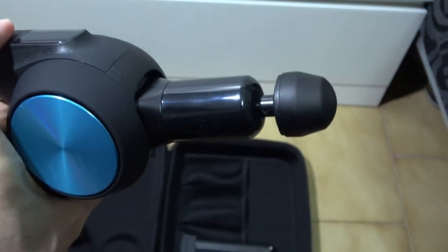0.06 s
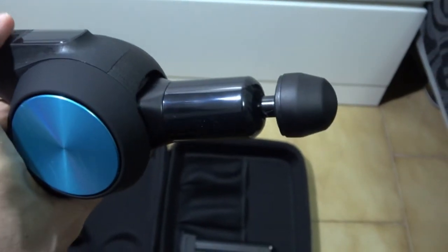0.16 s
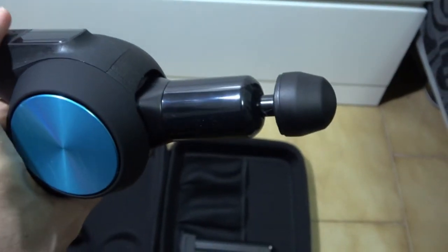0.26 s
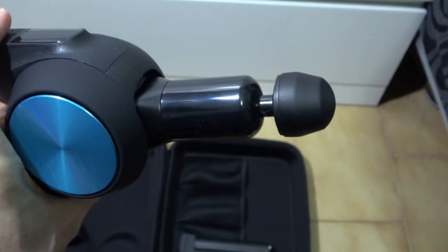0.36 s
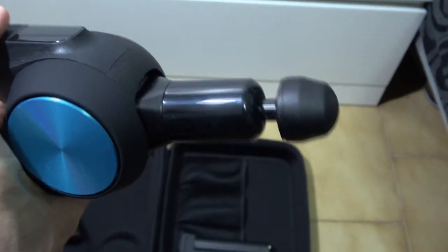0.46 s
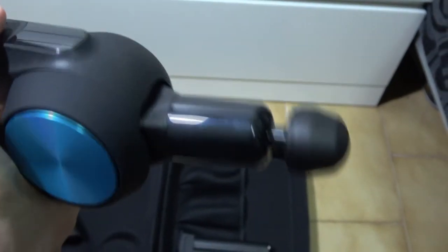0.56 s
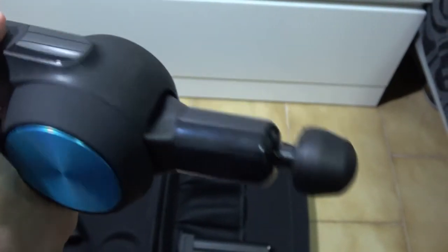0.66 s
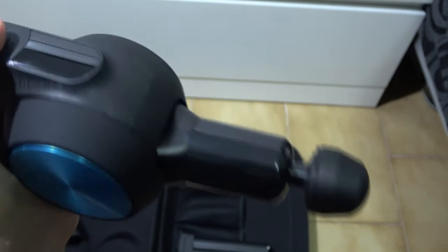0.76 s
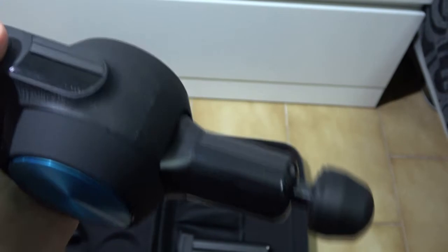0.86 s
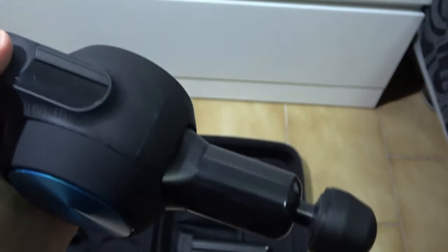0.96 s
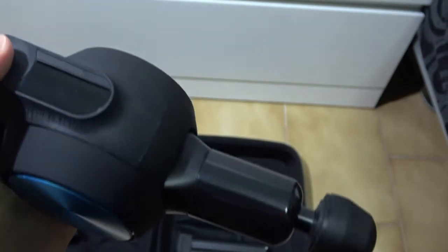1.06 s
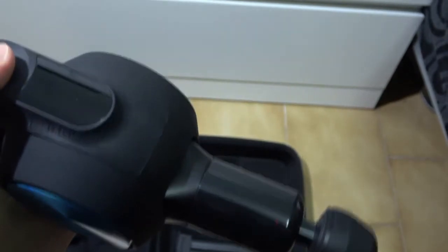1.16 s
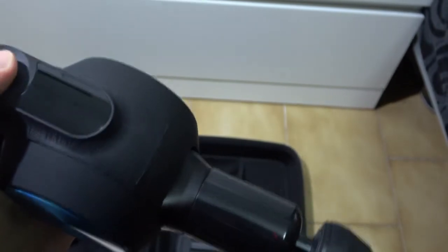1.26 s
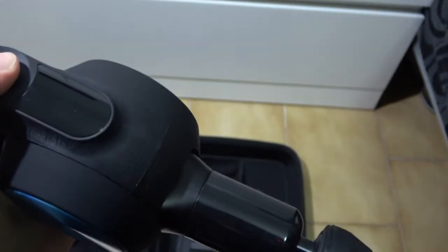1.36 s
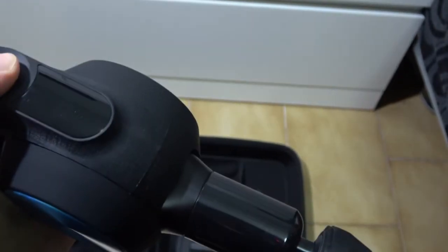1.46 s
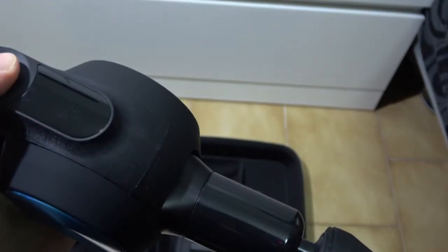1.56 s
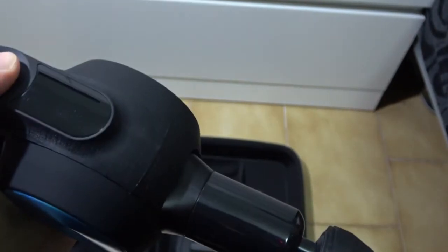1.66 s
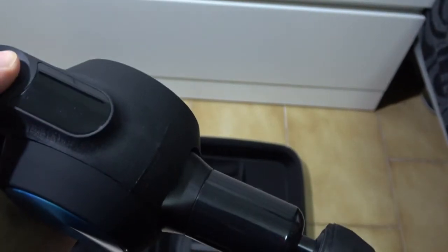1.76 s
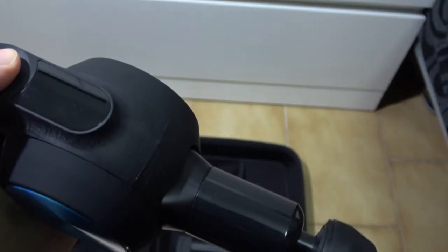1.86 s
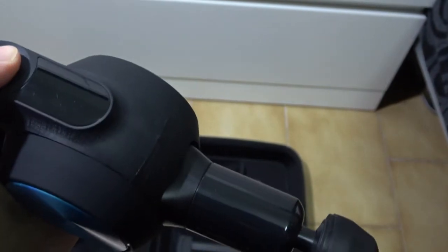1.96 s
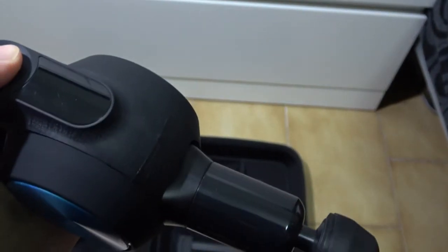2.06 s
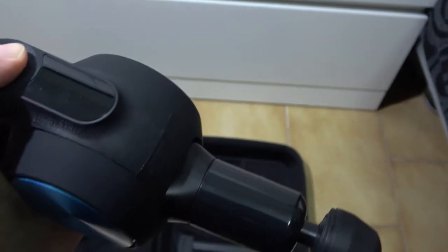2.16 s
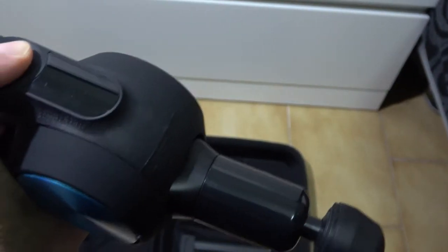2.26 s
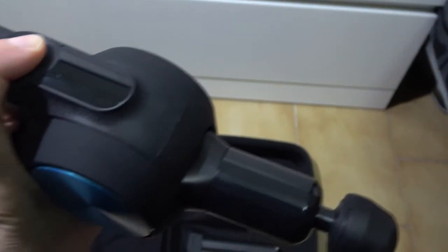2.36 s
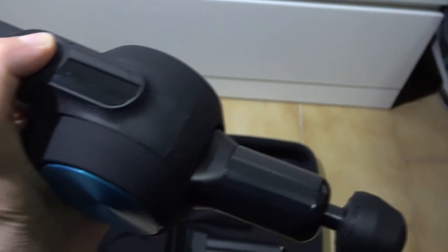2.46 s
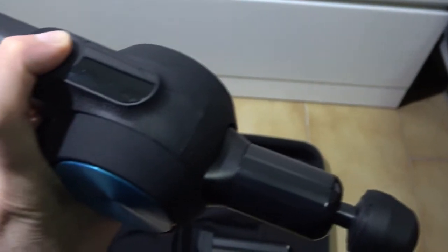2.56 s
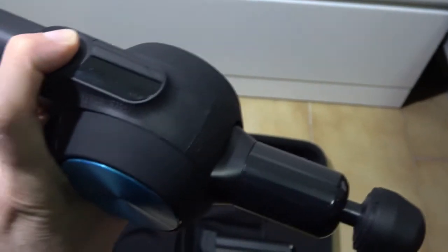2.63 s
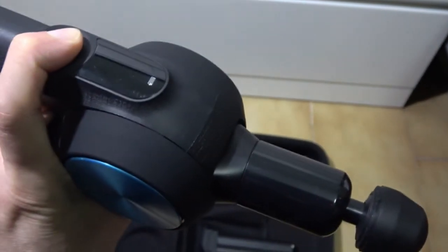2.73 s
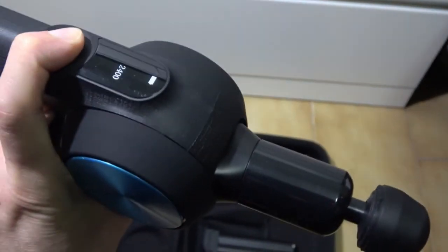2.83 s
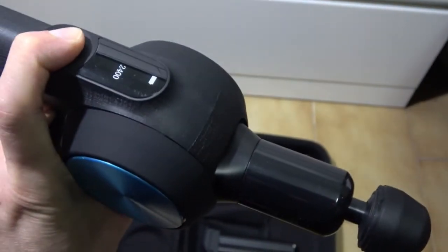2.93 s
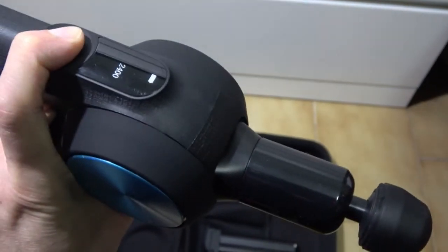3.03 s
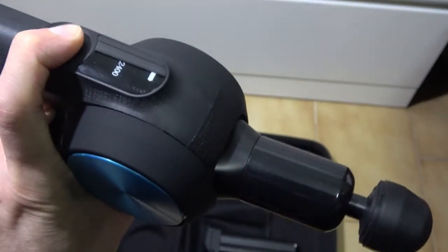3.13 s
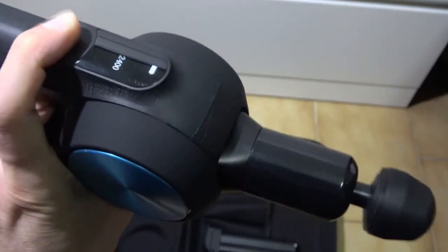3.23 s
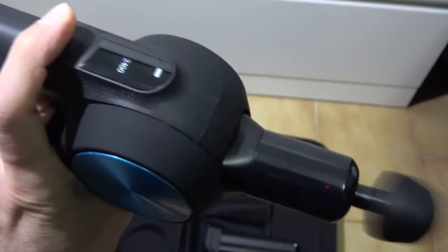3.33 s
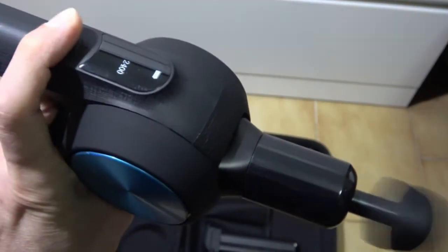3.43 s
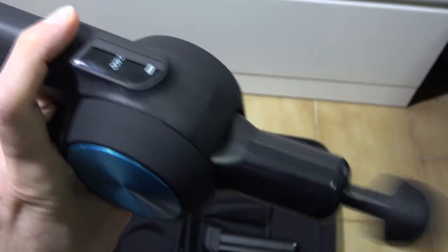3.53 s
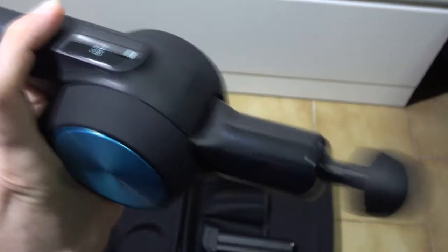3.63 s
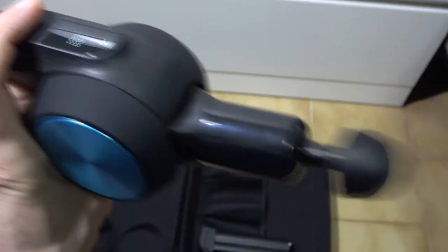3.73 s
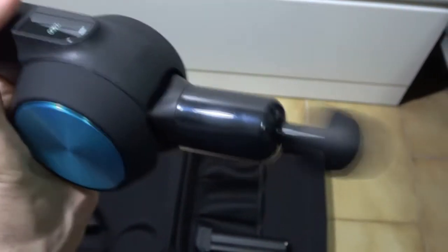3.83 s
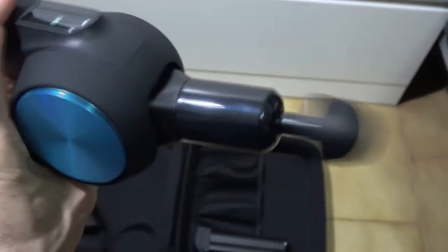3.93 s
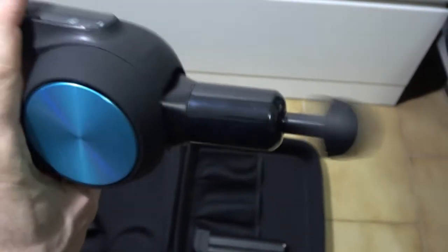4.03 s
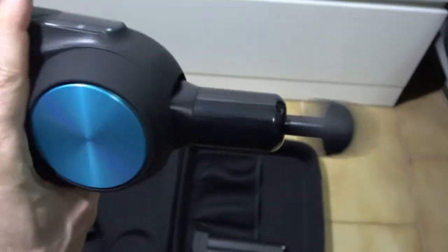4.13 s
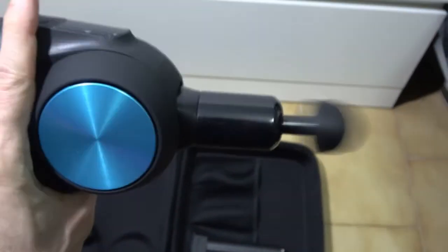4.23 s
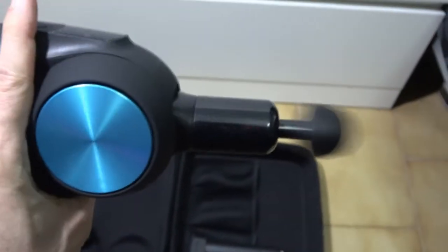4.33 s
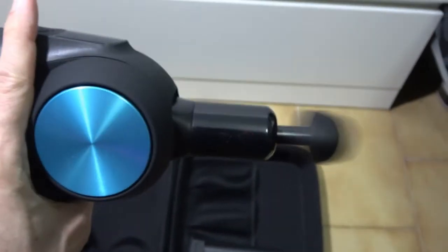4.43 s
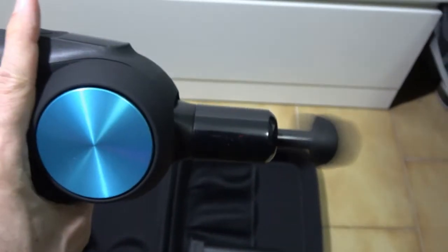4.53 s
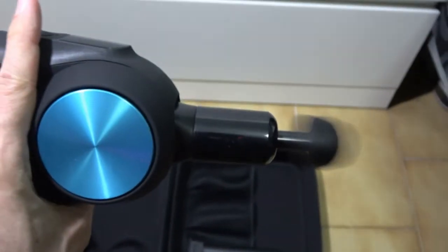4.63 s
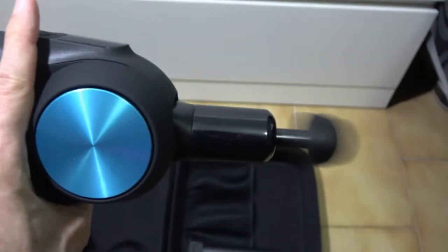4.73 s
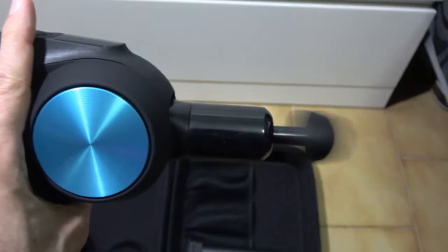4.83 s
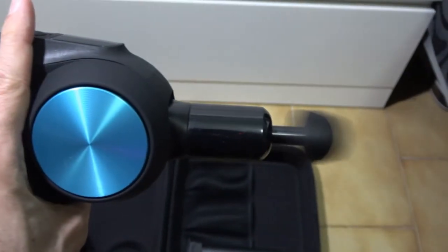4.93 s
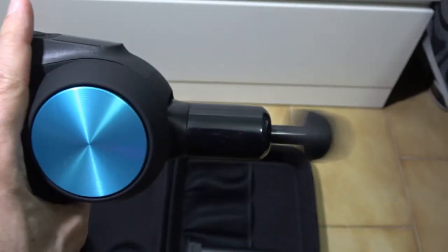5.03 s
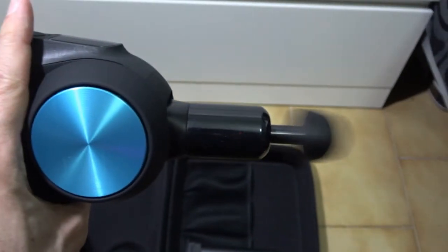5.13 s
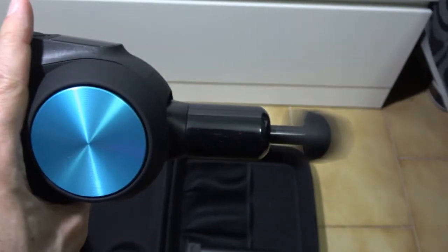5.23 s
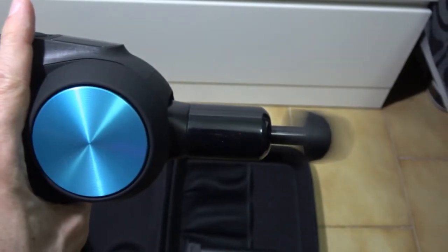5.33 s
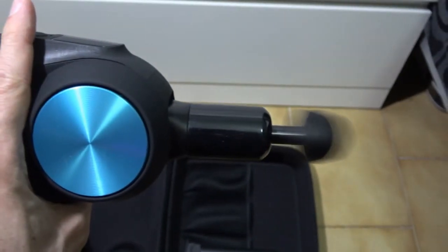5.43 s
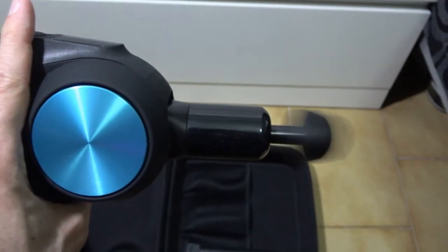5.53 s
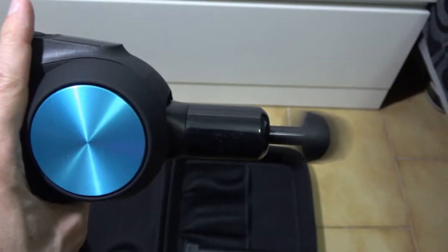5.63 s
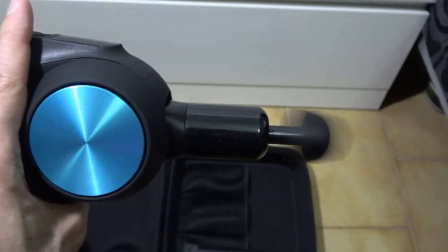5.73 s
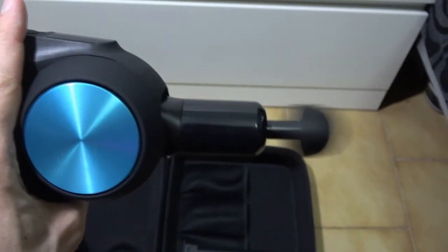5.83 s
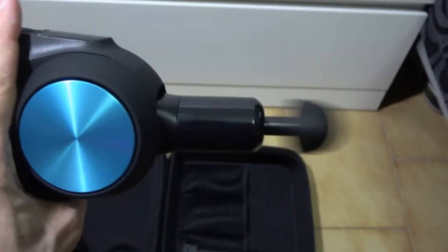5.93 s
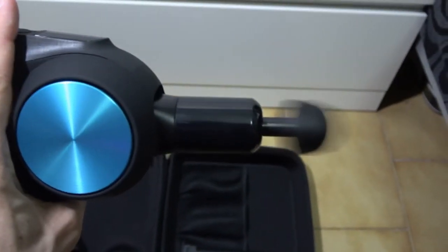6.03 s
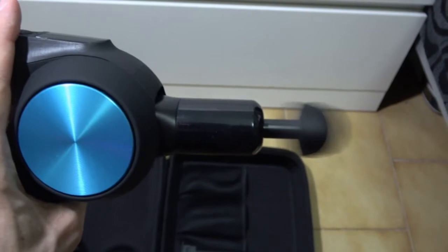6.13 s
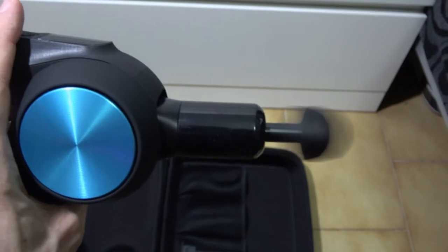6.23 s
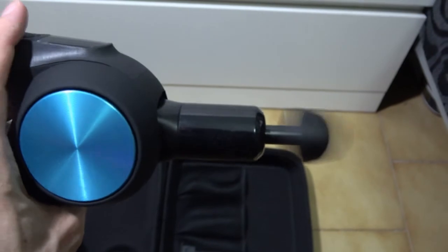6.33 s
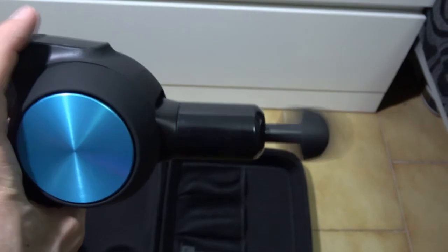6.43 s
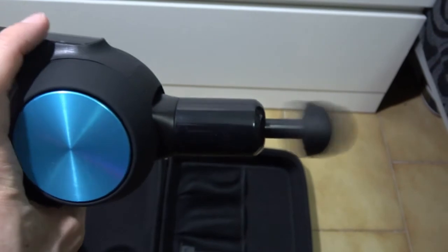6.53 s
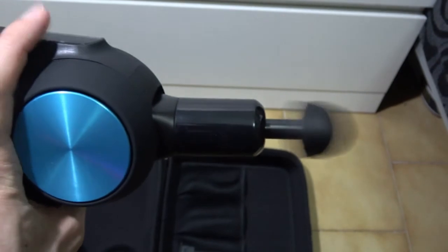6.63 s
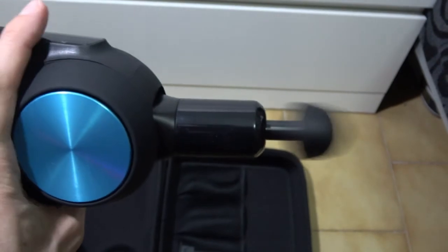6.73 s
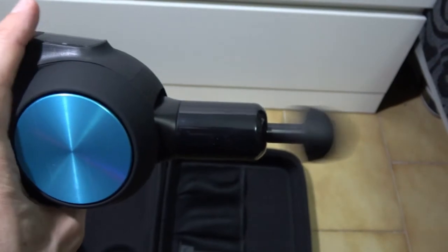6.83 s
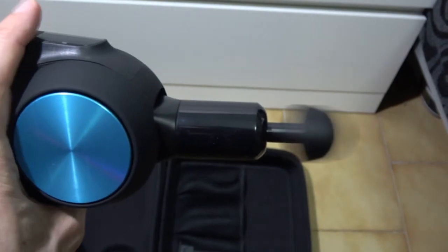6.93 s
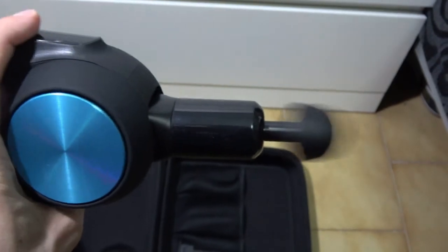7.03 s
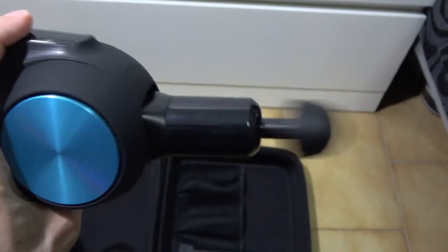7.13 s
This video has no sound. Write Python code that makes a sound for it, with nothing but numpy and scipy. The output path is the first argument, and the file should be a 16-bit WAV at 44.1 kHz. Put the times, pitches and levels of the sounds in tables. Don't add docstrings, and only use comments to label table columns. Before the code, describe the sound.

A quiet small tiled room with a faint distant appliance hum. Fingers tick and briefly rub a hard plastic shell, then button snaps sound close by. After the last snap a handheld massage gun lurches on, spins up within about half a second, and runs with rapid knocking, gear whine and bearing hiss, its pitch creeping upward to the end. Close stereo microphones, gun slightly left, with little echo.

```python
import sys
import numpy as np
from scipy import signal
from scipy.fft import rfft, irfft, next_fast_len
from scipy.io import wavfile
from scipy.ndimage import uniform_filter1d

SR = 44100
rng = np.random.default_rng(int(sys.argv[2]) if len(sys.argv) > 2 else 0)


def output_pcm(signal):
    pcm = np.clip(np.atleast_2d(signal).T, -1, 1) * 32767
    wavfile.write(sys.argv[1], SR, np.round(pcm).astype(np.int16))


def volts_from_db(level):
    exponent = np.asarray(level, float) / 20
    return 10 ** exponent


N = 316638

# (frequency [Hz], density [dB per Hz])
ROOM_TONE = [(13, -33), (22, -9.5), (47, -4.5), (66, -12.5), (105, -3.5), (221, -10.5), (504, -7.5),
             (701, -5.5), (898, -5.5), (1150, -11.5), (1280, -8.5), (1390, -16.5), (2850, -25), (3180, -30),
             (15600, -33.5)]
# (frequency [Hz], level [dB])
ROOM_SIDE = [(40, -29), (150, -9), (600, -14.0), (1600, -15.5), (5000, -5.0), (14000, -19)]
# (frequency [Hz], level [dB rms])
APPLIANCE_HUM = [(102.3, -81), (915.2, -66), (1098, -77.5)]
# (time [s], peak [dB], low ring [Hz], crack [dB], crack tilt [dB per octave])
CLICKS = [(0.5916, -53, 770, -3, -6), (1.131, -52, 1790, 0, 0), (1.137, -51, 2200, 1, -1),
          (1.2093, -52, 910, -0.5, 2), (1.29, -28, 1450, -9, 8), (1.2956, -40, 1300, 0.5, -5.5),
          (2.2543, -54, 910, -6, -10), (2.4604, -53, 790, -10, -1.5), (2.7512, -27, 1520, 0, 3),
          (2.7546, -20.5, 970, -13.5, 6), (3.239, -33, 1350, -7, -4.5), (3.2436, -35, 1270, -4, -6),
          (3.327, -27.5, 1140, -6, -13), (3.3290, -20, 977, -8, 2)]
# (frequency [Hz], level [dB], t60 [s])
BUTTON_MODES = [(1350, -2, 0.0043), (1700, -5, 0.04), (2060, -39, 0.041), (2730, -16.5, 0.0086),
                (570, -9, 0.054), (3630, -10, 0.014)]
# (frequency [Hz], level [dB], t60 [s])
BUTTON_TREBLE_MODES = [(5900, -35, .01), (7930, 9.5, 0.01), (8750, -32, .012), (11100, -33, .015)]
# (frequency [Hz], density [dB per Hz])
CRACK_COLOUR = [(300, -42), (600, 4), (1200, 13.5), (2500, 6), (4000, -7.5), (5600, 0), (8500, -13),
                (10000, -12.5), (12000, -13), (15500, -31)]
# (frequency [Hz], density [dB per Hz])
RUB_COLOUR = [(710, -42), (1200, -10), (2410, -3), (3110, -14), (5730, -15.5), (8600, -18), (9890, -14),
              (11100, -23), (15500, -29)]
# (frequency [Hz], level [dB])
LEFT_OVER_RIGHT = [(30, -0.5), (80, 2), (350, 2.4), (700, 4), (1400, 5.5), (2800, 2.5), (6000, 2.5),
                   (14000, 0)]
# (time [s], speed [strokes per s])
CRANK_SPEED = [(3.33, 11.65), (3.42, 12.32), (3.55, 19.39), (3.66, 23.76), (3.8, 26.73), (3.9, 27.5),
               (4.11, 28.59), (4.25, 28.87), (4.8, 29.32), (5.35, 29.5), (5.56, 29.93), (6.1, 31.41),
               (6.4, 32.29), (7.0, 34.23), (7.18, 34.67)]
# (crank angle [turn 0-1], frequency [Hz], t60 [s], level [dB])
SLACK = [(0.65, 500, 0.039, -34), (0.665, 860, 0.088, -33.5), (0.82, 1060, 0.036, -34.5)]
# (crank angle [turn 0-1], frequency [Hz], t60 [s], level at low speed [dB], level at high speed [dB])
CONTACTS = [(0.045, 282, 0.031, -5, -32), (0.12, 836.3, 0.1, -4, 2.5), (0.131, 1555, 0.048, -17, -26),
            (0.201, 820, 0.061, -0.5, -1), (0.23, 712, 0.017, 1.5, -13), (0.329, 257, 0.042, -21, -4.5),
            (0.436, 590, 0.024, -3.5, -24), (0.589, 3070, 0.034, -15, -18), (0.622, 941, 0.042, -2, -8),
            (0.654, 774, 0.056, -16.5, -6.5), (0.679, 1788, 0.025, -6.5, -4.5),
            (0.708, 1435, 0.061, -10.5, -39), (.74, 1730, 0.0077, -23.5, 3.5), (0.761, 631, 0.031, 3, 4),
            (0.789, 432, 0.027, -7, -3), (0.803, 250, 0.0087, 5.5, 3), (0.831, 331, 0.042, -9, -22),
            (0.279, 454, 0.046, -7.5, -20.5), (0.656, 515, 0.072, -14.5, -16), (0.857, 1148, 0.012, -5, -2)]
# (frequency [Hz], width [Hz], level [dB])
SHELL_MODES = [(1810, 370, -28.5), (2407, 73, -22), (3270, 220, -30), (5380, 350, -28.5), (5790, 290, -25),
               (8520, 195, -22), (12000, 210, -25), (13500, 170, -41.5)]
# (frequency [Hz], density [dB per Hz])
RATTLE_COLOUR = [(150, -36), (300, -24), (700, -17), (1000, -11), (1300, -5), (1780, -.1), (2200, -6),
                 (3000, -9), (4500, -15), (7000, -40)]
# (frequency [Hz], density [dB per Hz])
HISS_COLOUR = [(2060, -53), (3500, -24), (4440, 11), (5060, -21), (6190, 15), (7190, 12.5), (8520, 20),
               (9650, -38), (11400, 9), (11600, -31), (12400, -25), (14800, -42), (15600, -13)]
# (crank angle [turn 0-1], level [dB])
TOOTH_LOAD = [
    (0, -5),
    (.15, 1),
    (.4, 1.5),
    (.7, -1.54),
    (.85, 2.2),
    (.9, -1),
    (1, -16),
]
# (time [s], mesh tone [dB], sideband against it [dB], where they beat loudest [turn 0-1])
GEAR_MESH = [(3.4, -66, -3, 0.5), (3.58, -50, 0, 0.5), (3.68, -45, 3, 0.35), (3.82, -39.5, -22, 0),
             (4.0, -33, -29, 0.1), (4.25, -34.5, -3.5, 0.41), (4.55, -35, -5.5, 0.57),
             (4.85, -41.5, -2, 0.52), (5.3, -38, -4, .59), (5.62, -42, 2, .58), (5.85, -45, -7, 0.55),
             (6.1, -39.5, -3.5, .4), (6.4, -42, -0.5, .45), (6.62, -34, -2, .45), (6.95, -43, 8.5, .46),
             (7.18, -37.5, 1, 0)]
OVERTONES = [2, 3, 6, 9, 10]
OVERTONE_DB = [-7.5, -1.95, 0, -4.2, -16]
# (frequency [Hz], width [Hz], level [dB])
HOUSING_MODES = [(970, 160, -38), (1352, 190, -44), (1682, 106, -43), (1866, 82, -41.5), (2105, 146, -52),
                 (2314, 53, -55), (2438, 91, -48), (4287, 330, -54), (5360, 630, -53.5), (5570, 260, -64),
                 (6300, 320, -46.5), (6850, 400, -48), (7450, 380, -59), (8444, 250, -32.5)]
FAINT_ORDERS = [48, 97, 104, 130, 162, 182, 195, 208, 246, 286, 312, 364, 416, 338, 234]
FAINT_DB = [-68, -74, -74, -76, -71, -76, -70, -70, -69, -70, -70, -84, -84, -77, -69]
# (frequency [Hz], width [Hz], level [dB])
SQUEAL_MODE = (2425, 33, -34)

START_S = CRANK_SPEED[0][0]
TEETH = 26
CRUISE_PER_S = 29
KNOCK_DB, KNOCK_DB_PER_SPEED = -44.5, 0.52
RATTLE_DB, RATTLE_DB_PER_SPEED = -41.5, 0.5
HISS_DB, PULLING_DB, STRAIN_DB = -53.5, 3.5, 3
FULL_PULL = 2.8
FLIP_PER_S = 30.7
FLIP_TURNS, KNOCK_LAG_TURNS = 0.35, 0.05


def seconds(size=N):
    return np.arange(size) / SR


def sine(turns):
    return np.sin(2 * np.pi * turns)


def highpass(x, order, hz):
    return signal.sosfilt(signal.butter(order, hz, "high", fs=SR, output="sos"), x)


def rms_one(x):
    return x / np.sqrt(np.mean(x ** 2) + 1e-20)


def in_time(rows):
    s, *columns = np.transpose(rows)
    return np.array([np.interp(seconds(), s, column) for column in columns])


def filtered(x, points, size=N):
    hz, db = np.transpose(points)
    padded = next_fast_len(size + 4096)
    log_hz = np.log(np.maximum(np.arange(padded // 2 + 1) * SR / padded, 1))
    gain = volts_from_db(np.interp(log_hz, np.log(hz), db))
    return irfft(rfft(x, padded) * gain, padded)[..., :size]


def drift(rate):
    r = np.exp(-80 * np.pi * rate / SR)
    noise = rng.standard_normal(N // 40 + 2002)
    slow = signal.lfilter([1], [1, -2 * r, r * r], noise)[2000:]
    return np.interp(np.arange(N) / 40, np.arange(len(slow)), rms_one(slow))


def ring(hits, hz, t60):
    r = volts_from_db(-60 / (max(t60, 0.003) * SR))
    w = 2 * np.pi * hz / SR
    return signal.lfilter([0, np.sin(w)], [1, -2 * r * np.cos(w), r * r], hits + 1e-18)


def resonance(x, hz, width):
    r = np.exp(-np.pi * width / SR)
    poles = [1, -2 * r * np.cos(2 * np.pi * hz / SR), r * r]
    return signal.lfilter([(1 - r * r) / 2, 0, (r * r - 1) / 2], poles, x)


def background():
    mid, side = filtered(rng.standard_normal((2, N)), ROOM_TONE)
    side = filtered(side, ROOM_SIDE)
    level = volts_from_db(-60 + 0.3 * drift(7.6))
    tone = level * (mid + side * [[1], [-1]]) / np.std(mid)
    hum = sum(volts_from_db(db + 0.35 * drift(7.1)) * np.sqrt(2) * sine(hz * seconds())
              for hz, db in APPLIANCE_HUM)
    return tone + hum


def clicks():
    out, size = np.zeros(N), 9000
    luck = rng.normal(0, 1.0, (len(CLICKS), len(BUTTON_MODES) + len(BUTTON_TREBLE_MODES)))
    grit = rng.standard_normal((len(CLICKS), size))
    t = seconds(size)
    burst = volts_from_db(-60 * t / 0.014) + volts_from_db(-22 - 60 * t / 0.3)
    for (s, db, hz, crack_db, tilt_db), chance_db, noise in zip(CLICKS, luck, grit):
        cycles = 59 if s == CLICKS[-1][0] else 22.6
        low_note = ring(t == 0, hz, cycles / hz) * (1 - np.exp(-t * hz)) * volts_from_db(3.0)
        modes = [(f, d - 6, t60) for f, d, t60 in BUTTON_MODES]
        modes += [(f, d + crack_db - 18, t60) for f, d, t60 in BUTTON_TREBLE_MODES]
        button = sum(volts_from_db(d + c) * ring(t == 0, f, t60) for (f, d, t60), c in zip(modes, chance_db))
        colour = [(f, d + tilt_db * np.log2(f / 2500)) for f, d in CRACK_COLOUR]
        crack = volts_from_db(crack_db + 3.0) * burst * filtered(noise, colour, size=size)
        start = round(s * SR)
        out[start:start + size] += volts_from_db(db - 9) * (low_note + button + crack)
    return highpass(out, 3, 430)


def rub():
    grit = rng.standard_normal(N) * volts_from_db(1.8 * drift(300.0))
    late = seconds() - 0.754
    level_db = -49.5 + np.minimum(880 * late, -750 * late)
    return volts_from_db(np.maximum(level_db, -200)) * rms_one(filtered(grit, RUB_COLOUR))


def room(x):
    t = seconds(SR // 2)
    t60, unlike = 0.41, 0.36
    mid, side = rng.standard_normal((2, len(t))) * volts_from_db(-60 * t / t60) * (t > 0.004)
    tail = signal.lfilter([0.5], [1, -0.45], mid + unlike * side * [[1], [-1]])
    tail /= np.sqrt(np.sum(tail ** 2) / 2)
    return signal.fftconvolve(x[None], tail, axes=1)[:, :N]


def scatter(x):
    t = seconds(SR // 20)
    echo = rng.standard_normal(len(t)) * np.exp(-t / 0.0028)
    echo /= np.sqrt(np.sum(echo ** 2))
    return volts_from_db(-14.5) * signal.fftconvolve(highpass(x, 2, 5000), echo)[:N] * [[1], [-1]]


def past_flip(speed):
    return np.clip(speed - FLIP_PER_S + 0.5, 0, 1)


def strain(speed):
    return np.exp(-((speed - 24) / 2.5) ** 2)


def drive(speed):
    acceleration = uniform_filter1d(np.gradient(speed) * SR, size=6000)
    pull = np.clip(acceleration / FULL_PULL, 0, 1)
    jolt = np.clip(1 - (seconds() - START_S) / 0.022, 0, 1)
    knock_db = KNOCK_DB + KNOCK_DB_PER_SPEED * (speed - CRUISE_PER_S) + 16 * jolt
    rattle_db = RATTLE_DB + RATTLE_DB_PER_SPEED * (speed - CRUISE_PER_S) + 21 * jolt
    hiss_db = HISS_DB + PULLING_DB * pull + STRAIN_DB * strain(speed) + 11.5 * jolt
    return knock_db, rattle_db, hiss_db


def passing(turns, turn):
    return np.diff(np.floor(turns - turn), prepend=-1.) > 0


def slack(turns, speed):
    fading = np.clip((27 - speed) / 6, 0, 1)
    return sum(ring(passing(turns, turn) * fading * volts_from_db(db), hz, t60) for turn, hz, t60, db in SLACK)


def knocks(turns, speed, knock_db, rattle_db):
    low, high = np.zeros(N), np.zeros(N)
    fast = np.clip((speed - 29.5) / 4, 0, 1)
    for turn, hz, t60, slow_db, fast_db in CONTACTS:
        wander_db = 1.2 * drift(0.6) + 0.5 * drift(15.0)
        hit_db = slow_db + fast * (fast_db - slow_db) + wander_db
        rung = -ring(passing(turns, turn) * volts_from_db(hit_db), hz, t60)
        if hz < 450:
            rung *= np.minimum(speed / 28, 1) ** 3
        if hz < 1200:
            low += rung
        else:
            high += rung
    return volts_from_db(knock_db + 4) * rms_one(low) + volts_from_db(rattle_db - 11.5) * rms_one(high)


def shell(x):
    return sum(volts_from_db(db + 32.5 + 2.6 * drift(29.0)) * resonance(x, hz, width)
               for hz, width, db in SHELL_MODES)


def bearings(turns, rattle_db, hiss_db):
    load = volts_from_db(2.15 * np.cos(2 * np.pi * (turns - 0.72)) + 0.5 * drift(90.0))
    rattle = rms_one(filtered(rng.standard_normal(N) * load, RATTLE_COLOUR))
    flutter = volts_from_db(2.2 * drift(64.0) + 1.15 * drift(5.1))
    hiss = rms_one(filtered(rng.standard_normal(N) * flutter, HISS_COLOUR))
    through_shell = shell(rng.standard_normal(N))
    return volts_from_db(rattle_db - 8.0) * rattle + volts_from_db(hiss_db) * (volts_from_db(-2.5) * hiss + volts_from_db(0.9) * through_shell)


def whine(turns, speed):
    shaft = turns - 0.0077 + 0.00034 * sine(turns) + 0.00056 * drift(66.0)
    load_db = np.interp(turns % 1, *np.transpose(TOOTH_LOAD))
    mesh_db, side_db, lead = in_time(GEAR_MESH)
    slip = FLIP_TURNS * past_flip(speed)
    sideband = volts_from_db(side_db) * sine((TEETH - 1) * (shaft) + (TEETH - 1) * lead + slip)
    out = volts_from_db(mesh_db + load_db) * (sine(TEETH * shaft + slip) + sideband)
    return out


def whine(turns, speed):
    shaft = turns - 0.0077 + 0.00034 * sine(turns) + 0.00056 * drift(66.0)
    load_db = np.interp(turns % 1, *np.transpose(TOOTH_LOAD))
    mesh_db, side_db, lead = in_time(GEAR_MESH)
    slip = FLIP_TURNS * past_flip(speed)
    sideband = volts_from_db(side_db) * sine((TEETH - 1) * shaft + lead + slip)
    gear = volts_from_db(mesh_db + load_db) * (sine(TEETH * shaft + slip) + sideband)
    for k, db in zip(OVERTONES, OVERTONE_DB):
        tone_hz = k * TEETH * speed[::64]
        through = sum(volts_from_db(top_db) / (1 + (2 * (tone_hz - hz) / width) ** 2)
                      for hz, width, top_db in HOUSING_MODES)
        level_db = db + 2.06 * drift(117.0) + 1.15 * drift(4.5) + 0.5 * load_db + 1.3 * strain(speed)
        if k > 5:
            level_db += 5 * np.minimum(speed - 21.0, 0)
        gear += np.repeat(through, 64)[:N] * volts_from_db(level_db) * sine(k * TEETH * shaft)
    faint = sum(volts_from_db(db + 2.8 * drift(0.62)) * sine(order * shaft)
                for order, db in zip(FAINT_ORDERS, FAINT_DB))
    faint *= volts_from_db(10 * strain(speed))
    return np.sqrt(2) * gear + faint + volts_from_db(-14.0) * shell(faint)


def squeal(turns):
    hz, width, db = SQUEAL_MODE
    overtone = sine(4 * TEETH * turns)
    return volts_from_db(db) * resonance(resonance(overtone, hz, width), hz, 3 * width)


def sway(turns, speed):
    return volts_from_db(-70.5) * (speed / 32) ** 4 * (sine(turns) + 1.1 * sine(2 * turns))


def scene():
    running = np.clip((seconds() - START_S) / 0.0039, 0, 1)
    speed = in_time(CRANK_SPEED)[0]
    turns = np.cumsum(speed * (running > 0)) / SR
    knock_db, rattle_db, hiss_db = drive(speed)
    late_turns = turns - KNOCK_LAG_TURNS * past_flip(speed)
    motor = slack(turns, speed) + knocks(late_turns, speed, knock_db, rattle_db)
    motor += bearings(turns, rattle_db, hiss_db)
    motor += whine(turns, speed) + squeal(turns)
    gun = highpass(clicks() + rub() + running * motor, 6, 200.6)
    heard = background() * volts_from_db([[0.5], [-0.5]])
    heard = heard + gun + volts_from_db(-19) * room(gun) + scatter(gun) + running * sway(turns, speed)
    sides = [[(hz, way * db / 2) for hz, db in LEFT_OVER_RIGHT] for way in (1, -1)]
    return np.array([filtered(channel, side) for channel, side in zip(heard, sides)])


def band_limit(x):
    return signal.sosfilt(signal.butter(12, 15780, fs=SR, output="sos"), x)


def record(dry):
    top_cut = signal.ellip(10, 0.5, 70, 15650, fs=SR, output="sos")
    return band_limit(signal.sosfilt(top_cut, dry))


dry = scene()
out = record(dry)
output_pcm(out)
```